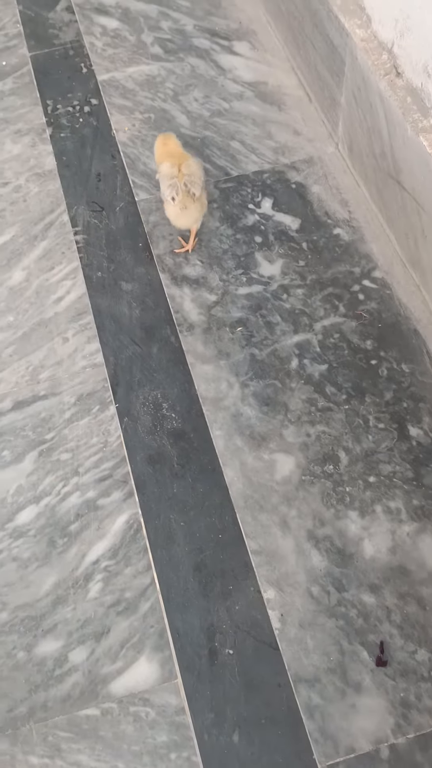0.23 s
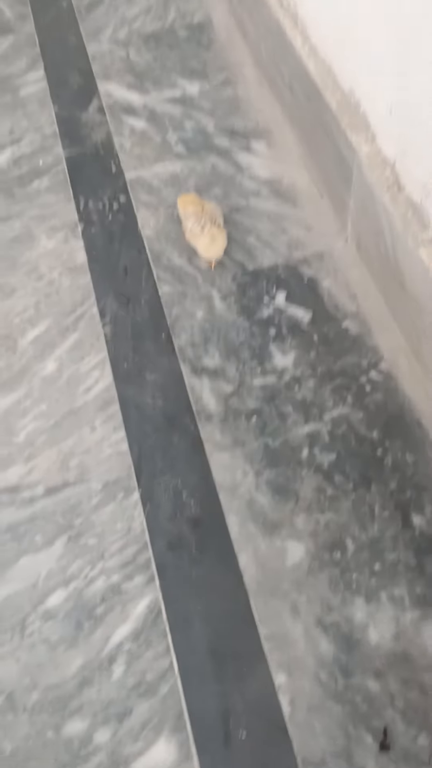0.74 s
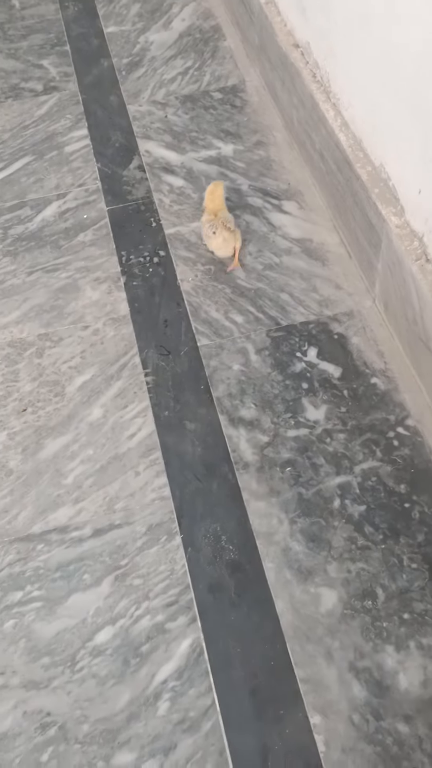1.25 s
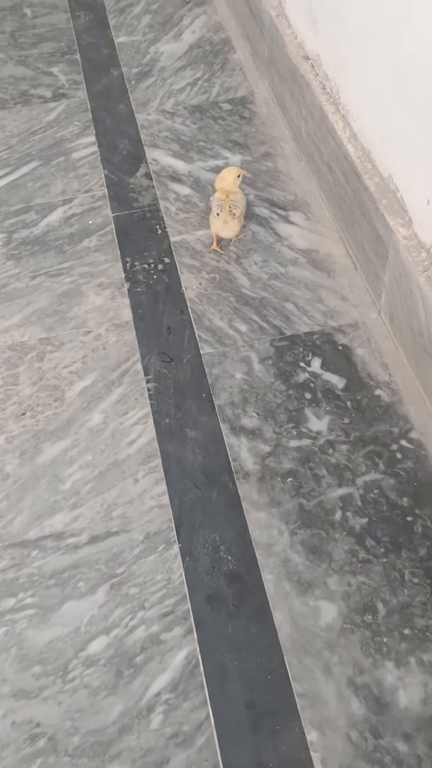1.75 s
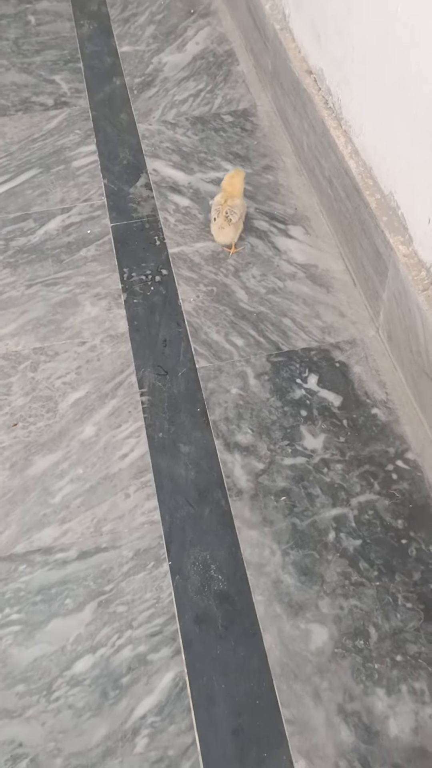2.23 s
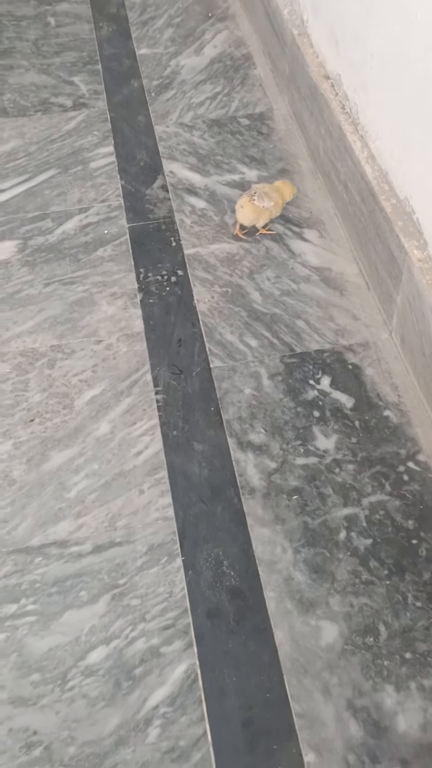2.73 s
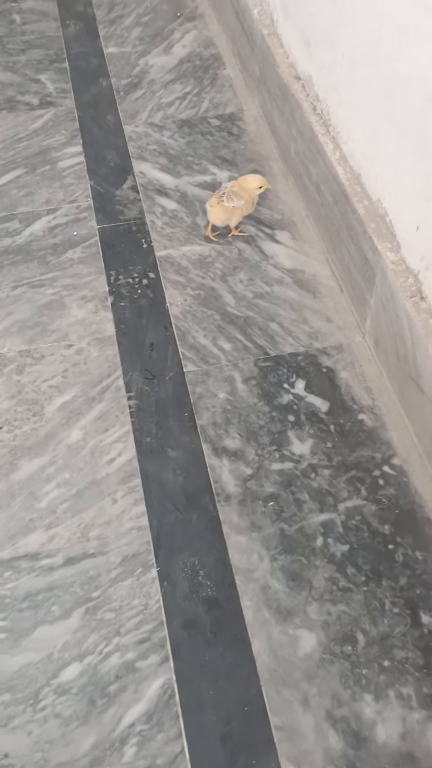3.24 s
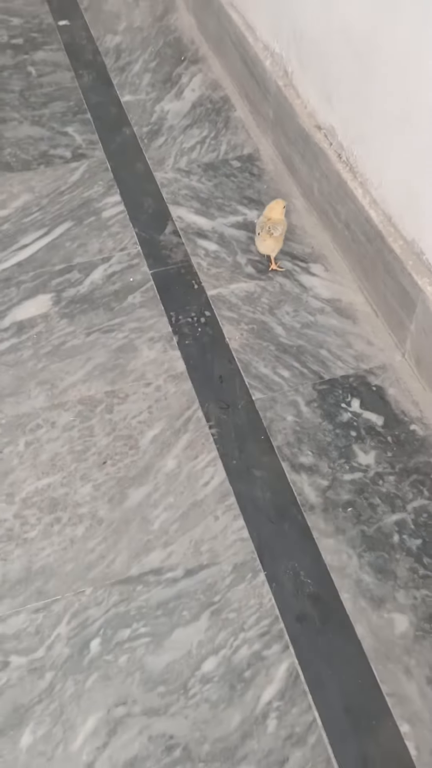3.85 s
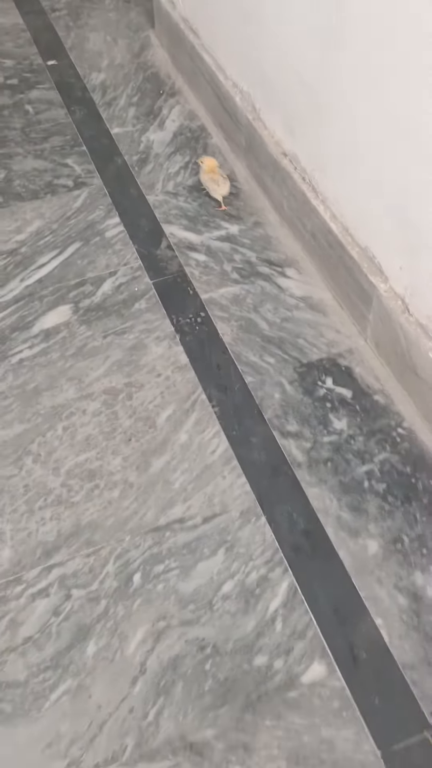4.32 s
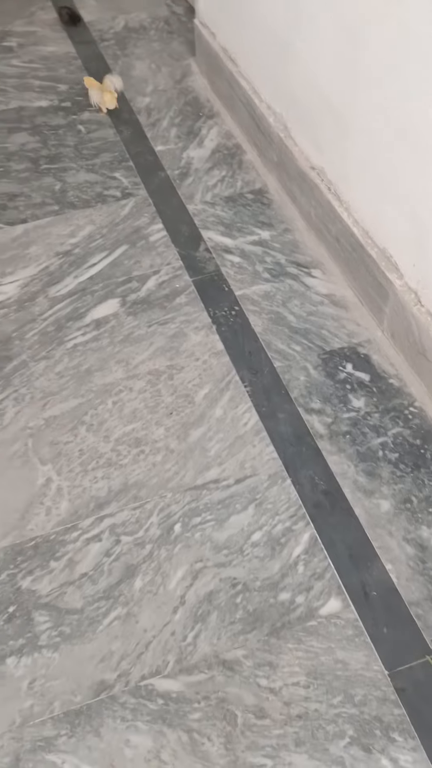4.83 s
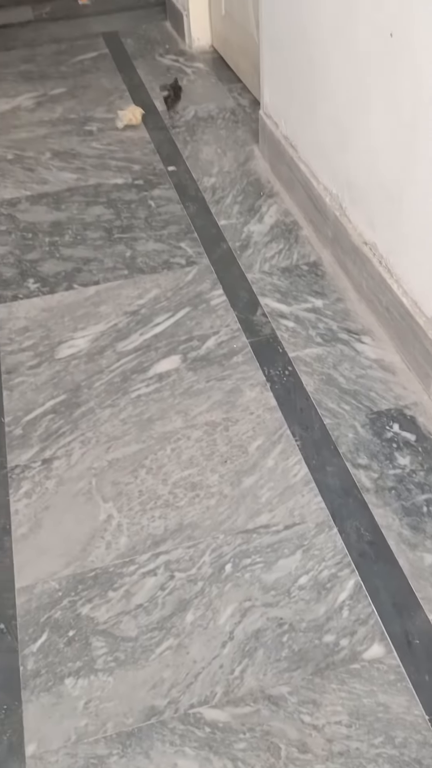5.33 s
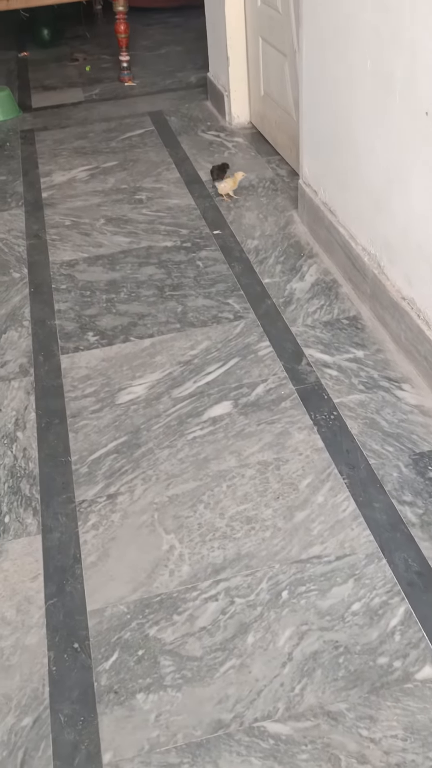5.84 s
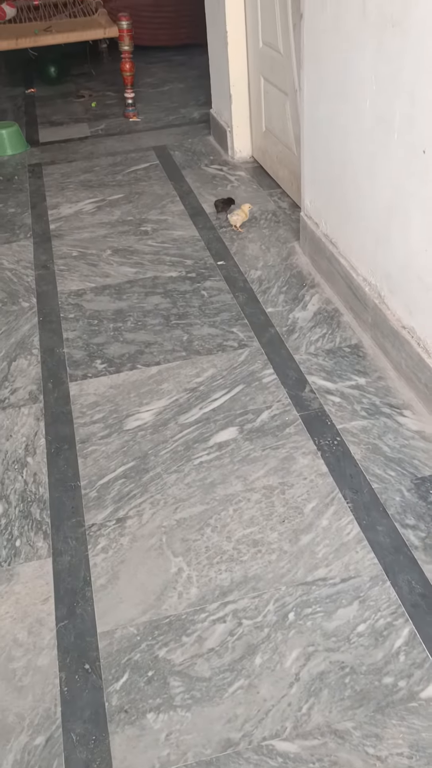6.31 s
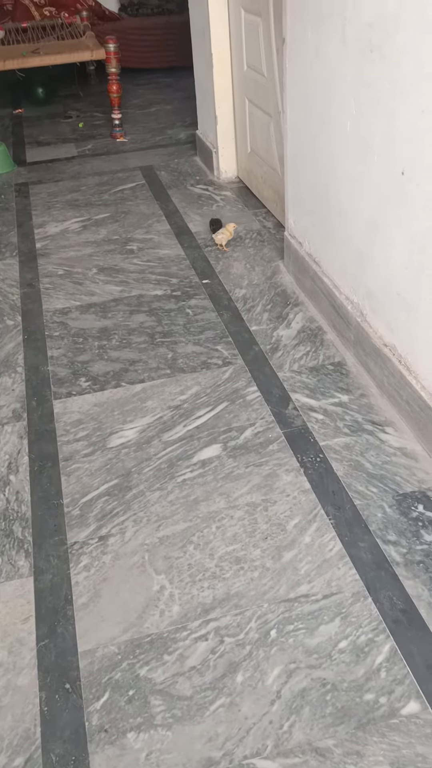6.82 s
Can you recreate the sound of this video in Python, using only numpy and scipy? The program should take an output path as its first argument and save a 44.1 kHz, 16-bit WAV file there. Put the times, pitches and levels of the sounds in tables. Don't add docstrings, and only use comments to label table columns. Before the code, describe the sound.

In a bare stone-floored corridor, sandals land with a sharp slap near one second and a louder heel crack before three, then scuff and slap more softly. A nearby chick gives tiny gliding whistles, clustering around four seconds and sharpest at five. Two soft low hollow knocks fall just before four. Hard walls ring after each contact; a phone microphone catches house rumble, faint hiss and swelling traffic. The end is quieter, with faint farther peeps.

```python
import sys
import numpy as np
from scipy import signal
from scipy.fft import rfft, irfft, next_fast_len
from scipy.io import wavfile
from scipy.ndimage import uniform_filter1d

SR = 44100
rng = np.random.default_rng(int(sys.argv[2]) if len(sys.argv) > 2 else 0)


def boost_factor(decibels):
    exponent = np.asarray(decibels, float) / 20
    return 10 ** exponent


def int16_out(signal):
    q = np.round(np.clip(np.atleast_2d(signal).T, -1, 1) * 32767)
    wavfile.write(sys.argv[1], SR, q.astype(np.int16))


N = 312095
T = np.arange(N) / SR

# frequency in Hz, level in dB per Hz.
HOUSE_LOW = [(12, -47), (20, -32), (38, 3.5), (112, -3.5), (229, -9.5), (266, -11.5), (309, -8.5),
             (455, -18), (512, -15.5), (700, -21.5), (910, -59), (1540, -120)]
# frequency in Hz, level in dB per Hz.
HOUSE_HIGH = [(410, -29), (700, -5.5), (1000, -8.5), (1500, -10), (2500, -13.5), (3300, -14.5), (4000, -20),
              (5000, -28.5), (6800, -23), (8500, -30), (11000, -31.5), (15000, -29.5), (16000, -34)]
# middle in seconds, half length in seconds, rumble swell in dB.
TRAFFIC = [
    (0.203, 0.18, 5.5),
    (1.243, 0.26, 3.5),
    (2.446, 0.61, 6.5),
    (3.204, 0.52, 6.5),
    (4.397, 0.29, 11),
    (6.146, 0.38, 4),
]
RUMBLE_DB, DRONE_DB, AIR_DB = -56.5, -55, -63

# start in seconds, length in seconds, start pitch in Hz, end pitch in Hz, level in dB.
NEAR_PEEPS = [(.794, 0.0167, 2790, 3350, -57), (1.95, 0.031, 3020, 2926, -60.5),
              (1.978, .022, 2980, 3580, -56.5), (2.035, .025, 3000, 3500, -62),
              (2.61, 0.025, 2680, 2670, -59.5), (2.646, 0.014, 2720, 3750, -54),
              (3.348, 0.014, 3500, 2950, -51.5), (3.372, 0.03, 3110, 3670, -51),
              (3.704, 0.031, 3360, 2950, -51), (3.74, .0183, 3300, 3840, -53),
              (3.992, .030, 3780, 2930, -47), (4.096, .027, 3950, 3050, -46.5),
              (4.214, .027, 3800, 2880, -46), (5.05, .012, 2990, 3570, -46.5),
              (5.059, 0.012, 3590, 3574, -39), (5.067, 0.0056, 3440, 2840, -46)]
# start in seconds, length in seconds, start pitch in Hz, end pitch in Hz, level in dB.
FAR_PEEPS = [
    (.01, .06, 2800, 2910, -73),
    (6.57, .17, 2970, 2930, -75),
    (6.96, .065, 3080, 3080, -58.5),
]

# start in seconds, length in seconds, level in dB, thud in dB, hiss in dB.
SLIDES = [(.62, .11, -76.5, -22, 3.5), (.725, 0.017, -65.5, -19.5, 4.5), (1.5, 0.57, -71.5, -19, -2.5),
          (1.66, .011, -73.5, -19.5, 7), (2.86, 0.07, -56, -7, -5.5), (3.17, 0.089, -62.5, -12, -4),
          (3.79, 0.039, -70.5, -7, 2), (4.37, 0.076, -55.5, -11, -8.5), (4.66, 0.18, -70, -17, -7),
          (5.115, .055, -60, -4, -0.5), (6.45, 0.33, -66.5, -37, -18), (6.85, .22, -67, -31.5, -19)]
# start in seconds, length in seconds, level in dB, thud in dB, hiss in dB.
SCUFFS = [(1.154, .08, -42, -16, -9.5), (2.103, 0.073, -61.5, -39, 0), (2.35, 0.029, -65, -22, 3),
          (3.52, 0.13, -57.5, -26, -6), (3.915, 0.032, -59.5, -16, 2), (3.95, .029, -59.5, -1, 2.5),
          (4.41, .115, -58, -12, -3.5), (4.815, .039, -45.5, -11, -1), (5.092, 0.022, -66.5, 2, 3),
          (5.338, 0.084, -58.5, -18, 1.5), (5.35, 0.2, -61, -19, -16)]
# start in seconds, length in seconds, level in dB, thud in dB, hiss in dB.
HEELS = [
    (1.007, 0.018, -39, 5, -5),
    (2.689, .012, -30.5, -4.5, -9),
    (2.720, 0.0056, -26, 3, -4),
    (3.4065, .009, -42, 4, -9),
    (3.845, 0.02, -47.5, 5.5, -12),
    (4.807, .013, -43.5, 1, -2),
]
# start in seconds, length in seconds, level in dB, thud in dB, hiss in dB.
SLAPS = [
    (1.0185, .007, -19, -5, -10),
    (2.707, 0.0098, -56, -7, 13),
    (3.417, 0.027, -37.5, 0.5, -4.5),
    (3.776, 0.0075, -68.5, -16, 9),
    (4.181, .008, -52.5, -3, 0),
    (4.299, .008, -70, -6, -3),
    (4.768, 0.0059, -58, -11, 0),
]
SLIDE_RISE, SCUFF_RISE, HEEL_RISE, SLAP_RISE = 0.44, 0.026, 0.13, 0.408
# frequency in Hz, level in dB per Hz.
SOLE = [(30, -24), (70, -9.5), (140, -3), (330, -7.5), (615, -3), (1200, -7), (2500, -8.5), (4000, -7.5),
        (5000, -17.5), (6900, -7.5), (8500, -15.5), (11000, -26.5), (14800, -35), (16000, -45)]
# frequency in Hz, width in Hz, boost in dB.
SQUEAK = [
    (1900, 220, 2.5),
    (2500, 380, 2),
]
# frequency in Hz, width in Hz, boost in dB.
SOLE_RING = [(456, 230, 1.5), (611, 19, 9), (824, 17, 0.5), (1034, 106, 1.5), (1320, 120, 0),
             (1756, 85, 1.5), (2340, 82, 3.5), (2950, 290, 4.5)]

# start in seconds, level in dB.
THUMPS = [
    (3.702, -40),
    (3.832, -38),
]
THUMP_HZ, THUMP_T60_S, THUMP_RISE_S = 202, .26, .009

# frequency in Hz, time to fall 60 dB in seconds.
RING = [(125, 1), (500, 1), (2000, 0.66), (7000, 0.69), (15000, 0.22)]
# frequency in Hz, likeness (1 is identical).
ALIKE = [(60, 0.98), (130, 0.94), (290, 0.85), (640, 0.33), (1410, -0.12), (3100, 0.02), (6820, 0.02),
         (15000, 0)]
# frequency in Hz, left minus right in dB.
PORTS = [(60, -7), (300, 3.5), (1000, -6), (2400, -2), (4400, -4), (8000, -2), (12000, -19.5), (15000, -51)]
WET_DB, FIRST_ECHO_S, LEFT_LAG_S = 2.5, 0.0018, .00045
NEAR_WALLS_DB, NEAR_WALLS_T60_S = -3, 0.049
FLUTTER_S, FLUTTER_LOSS_DB = .032, -5

TOP_HZ, OFFSET = 15800, -.0004


def on_log(table, hz):
    f, v = np.transpose(table)
    return np.interp(np.log(hz + 1), np.log(f + 1), v)


def colour(x, gain):
    size = next_fast_len(x.shape[-1])
    hz = np.arange(size // 2 + 1) * SR / size
    return irfft(rfft(x, size) * gain(hz), size)[..., :x.shape[-1]]


def unit(x):
    return x / np.sqrt(np.mean(x ** 2))


def step_up(hz, edge_hz):
    return 1 / (1 + (edge_hz / (hz + 1)) ** 6)


def walk(rate):
    hold = int(SR / rate)
    levels = np.repeat(rng.standard_normal(N // hold + 1), hold)
    return unit(uniform_filter1d(levels, hold)[:N])


def causal(gain, size=4096):
    hz = np.arange(size // 2 + 1) * SR / size
    cepstrum = irfft(np.log(gain(hz) + 1e-6))
    cepstrum[1:size // 2] *= 2
    cepstrum[size // 2 + 1:] = 0
    return irfft(np.exp(rfft(cepstrum)))


def diffuse(count):
    def likeness(hz):
        return np.clip(on_log(ALIKE, hz), -.9, .99)

    mid, side = rng.standard_normal((2, count))
    mid = colour(mid, lambda hz: np.sqrt((1 + likeness(hz)) / 2))
    side = colour(side, lambda hz: np.sqrt((1 - likeness(hz)) / 2))
    return np.array([mid + side, mid - side])


def house():
    low = colour(diffuse(N), lambda hz: boost_factor(on_log(HOUSE_LOW, hz)) * (1 - step_up(hz, edge_hz=1140)))
    deep = colour(low, lambda hz: 1 - step_up(hz, edge_hz=99.0))
    air = colour(diffuse(N), lambda hz: boost_factor(on_log(HOUSE_HIGH, hz)) * step_up(hz, edge_hz=380.0))
    swell_db = sum(db * np.exp(-((T - s) / half) ** 2) for s, half, db in TRAFFIC)
    rumble = unit(deep) * boost_factor(RUMBLE_DB + swell_db)
    drone = unit(low - deep) * boost_factor(DRONE_DB + .7 * walk(6))
    hiss = unit(air) * boost_factor(AIR_DB + 0.048 * walk(3.07))
    return (rumble + drone + hiss) * boost_factor(np.array([[-.4], [.4]]))


def chick(calls, overtone_db, waver):
    out = np.zeros(N)
    wobble = 1 + waver * walk(197)
    for s, length, start_hz, end_hz, db in calls:
        u = np.arange(int(length * SR)) / (length * SR)
        at = int(s * SR)
        pitch_hz = (start_hz + (end_hz - start_hz) * u) * wobble[at:at + len(u)]
        phase = 2 * np.pi * np.cumsum(pitch_hz) / SR
        whistle = np.sin(phase) + boost_factor(overtone_db) * np.sin(2 * phase)
        out[at:at + len(u)] += boost_factor(db) * np.sin(np.pi * u) ** 0.39 * whistle
    return out


def soles(contacts, rise, grit_db, grit_rate, squareness):
    grit = unit(rng.standard_normal(N) * boost_factor(grit_db * walk(grit_rate)))
    out = np.zeros(N + SR)
    for s, length, db, thud_db, hiss_db in contacts:
        at, count = int(s * SR), int(length * SR)
        peak = np.clip(rise, .02, .98)
        press = np.interp(np.arange(count) / count, [0, peak, 1], [0, 1, 0]) ** squareness
        push = press * grit[at:at + count]
        for _ in range(4):
            even = np.exp(1j * np.angle(rfft(push, 2 * count)))
            push = irfft(even)[:count] * np.sqrt(press)
        push = unit(push) * np.sqrt(np.mean(press ** 2))

        def sole_gain(hz):
            thud = thud_db * (1 - step_up(hz, edge_hz=1910))
            hiss = hiss_db * step_up(hz, edge_hz=3820)
            return boost_factor(db + 15.5 + on_log(SOLE, hz) + thud + hiss)

        sound = signal.fftconvolve(push, causal(sole_gain))
        out[at:at + len(sound)] += sound
    return out[:N]


def rung(x, modes, trim_db):
    def body_gain(hz):
        boost_db = sum(db / (1 + (2 * (hz - f) / width) ** 2) for f, width, db in modes)
        return boost_factor(boost_db + trim_db)

    return signal.fftconvolve(x, causal(body_gain))[:N]


def sole_scuffs():
    slides = soles(SLIDES, SLIDE_RISE, grit_db=2.5, grit_rate=190, squareness=0.23)
    skids = soles(SCUFFS, SCUFF_RISE, grit_db=2.5, grit_rate=190, squareness=0.23)
    return rung(slides + skids, SQUEAK, trim_db=-1.0)


def sole_slaps():
    heels = soles(HEELS, HEEL_RISE, grit_db=2.5, grit_rate=900, squareness=0.46)
    flats = soles(SLAPS, SLAP_RISE, grit_db=2.5, grit_rate=900, squareness=0.46)
    return rung(heels + flats, SOLE_RING, trim_db=-3.5)


def thumps():
    out = np.zeros(N)
    for s, db in THUMPS:
        t = np.clip(T - s, 0, None)
        build = 1 - np.exp(-t / THUMP_RISE_S)
        out += boost_factor(db - 60 * t / THUMP_T60_S) * build * np.sin(2 * np.pi * THUMP_HZ * t)
    return out


def fade(t, t60):
    return boost_factor(-60 * t / t60) / np.sqrt(t60 * SR / np.log(1e6))


def corridor(x, noise, direct_db, flutter_db):
    t = T[:SR]
    ring = 0
    for hz in 60 * 2. ** np.arange(9):
        band = colour(noise, lambda f: np.clip(1 - np.abs(np.log2((f + 1) / hz)), 0, 1))
        ring = ring + band * fade(t, on_log(RING, hz)) * boost_factor(WET_DB)
    near_walls = noise * fade(t, NEAR_WALLS_T60_S) * boost_factor(NEAR_WALLS_DB)
    ring = (ring + near_walls) * np.clip(t / FIRST_ECHO_S - 1, 0, 1)
    ring[0, int(LEFT_LAG_S * SR)] += boost_factor(direct_db)
    ring[1, 0] += boost_factor(direct_db)
    trips = np.arange(1, 8)
    ring[:, (trips * FLUTTER_S * SR).astype(int)] += boost_factor(direct_db + flutter_db + FLUTTER_LOSS_DB * trips)
    heard = signal.fftconvolve(x[None], ring, axes=1)[:, :N]
    return colour(heard, lambda hz: boost_factor(np.outer([.5, -.5], on_log(PORTS, hz))))


def scene():
    far_bird = chick(FAR_PEEPS, overtone_db=-17, waver=.014)
    near_bird = chick(NEAR_PEEPS, overtone_db=-34, waver=.003)
    echoes = diffuse(SR)
    bird = corridor(near_bird, boost_factor(-2) * echoes, direct_db=6, flutter_db=-11)
    slaps_and_far_bird = corridor(sole_slaps() + far_bird, echoes, direct_db=5.0, flutter_db=-11)
    scuffs = corridor(sole_scuffs(), echoes, direct_db=4.0, flutter_db=-10.5)
    return bird + slaps_and_far_bird + scuffs + thumps() + house()


def band_limit(x):
    return signal.sosfilt(signal.butter(12, 16480, fs=SR, output="sos"), x)


def record(dry):
    top_cut = signal.ellip(8, .2, 70, TOP_HZ, fs=SR, output="sos")
    mix = signal.sosfilt(top_cut, dry) + OFFSET
    return band_limit(mix)


dry = scene()
out = record(dry)
int16_out(out)
```